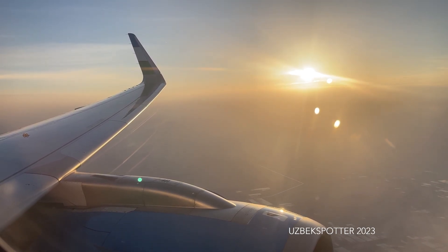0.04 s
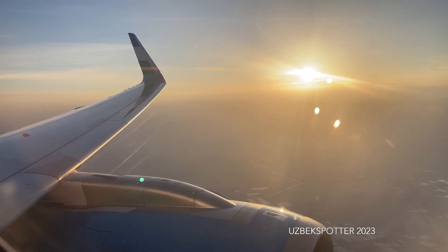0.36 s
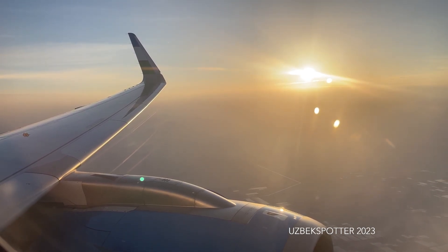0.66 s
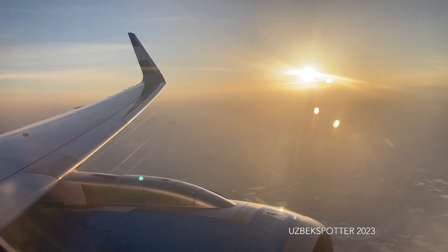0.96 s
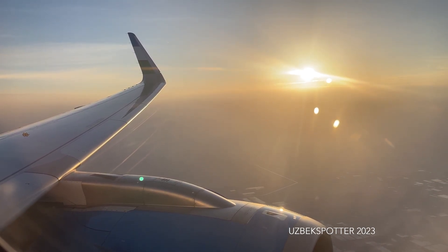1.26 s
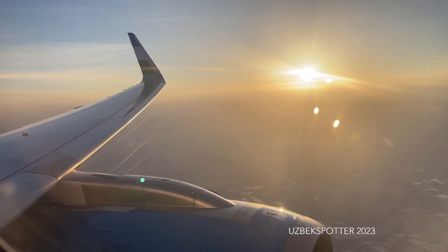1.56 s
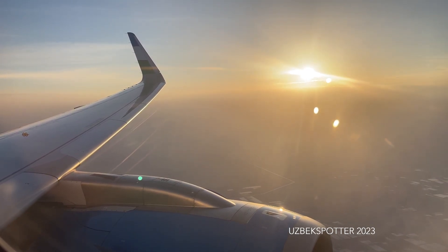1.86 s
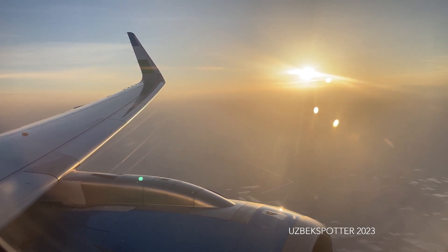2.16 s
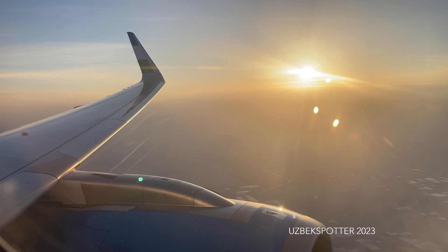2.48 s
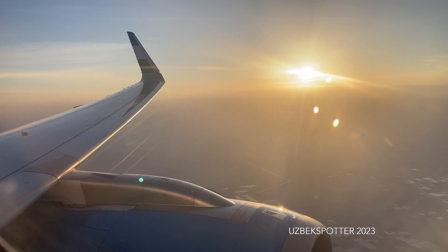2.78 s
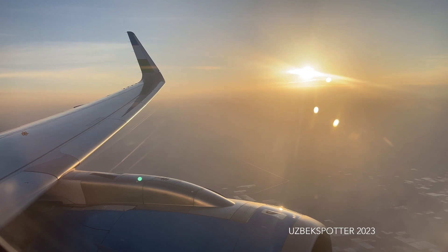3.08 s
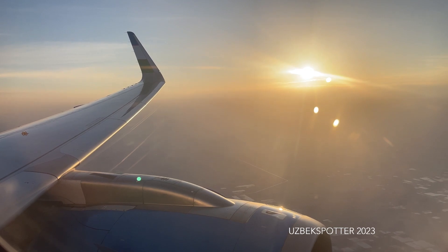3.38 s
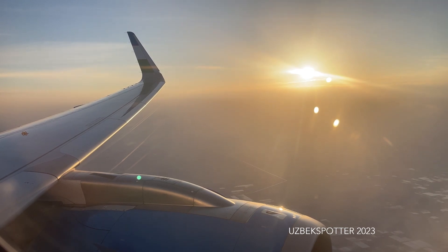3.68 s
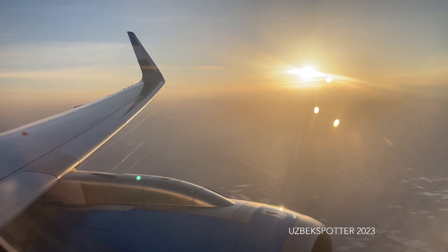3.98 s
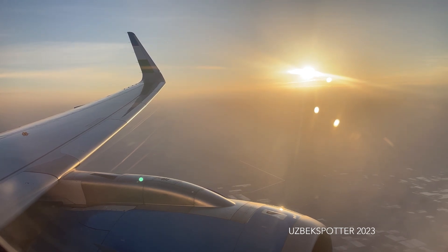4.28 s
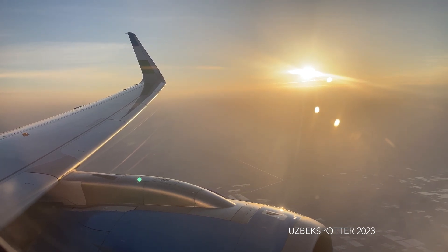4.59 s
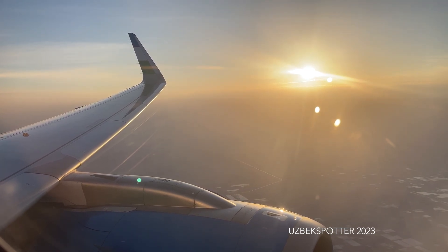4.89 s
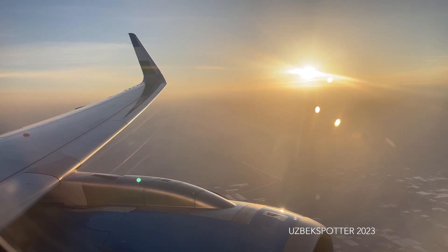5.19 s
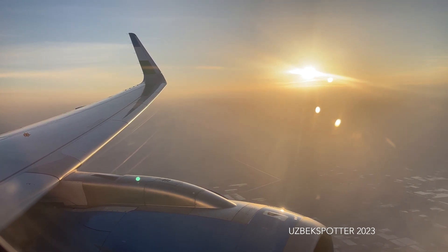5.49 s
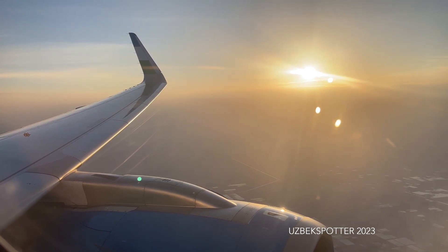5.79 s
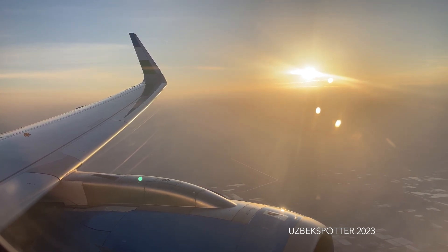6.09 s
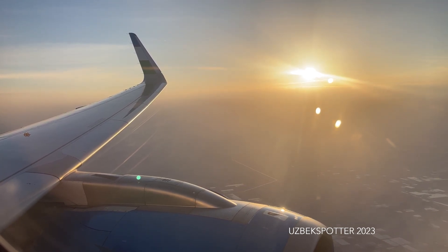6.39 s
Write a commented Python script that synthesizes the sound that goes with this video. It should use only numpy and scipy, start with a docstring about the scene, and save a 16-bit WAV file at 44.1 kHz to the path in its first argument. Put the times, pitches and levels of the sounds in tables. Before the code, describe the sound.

A steady, deep rumble of jet engines and rushing air fills an airliner cabin, heard from a window seat. A thin, high turbine whine holds to the right, and an air vent whistles faintly. Close to the microphone, plastic trim gives a soft knock early on, cloth rustles briefly midway, and another knock and a few small ticks come near the end.

```python
"""A steady, deep rumble fills a window seat beside the engine of a jet in cruise.
Engines and airflow shake the fuselage, and the cabin's resonances colour the roar. Air rushes along
the skin, a thin turbine whine stands to the right, beating with the far engine's, and a vent whistles
breathily. Close by, cloth rustles faintly and plastic trim knocks and ticks a few times."""
import sys
import numpy as np
from scipy import signal
from scipy.fft import rfft, irfft
from scipy.io import wavfile
from scipy.ndimage import uniform_filter1d

SR = 44100
rng = np.random.default_rng(int(sys.argv[2]) if len(sys.argv) > 2 else 0)


def persist_wave(psi):
    """Save psi, clipped to +-1, as 16-bit WAV."""
    counts = np.round(np.clip(psi, -1, 1) * 32767).astype(np.int16)
    wavfile.write(sys.argv[1], SR, np.atleast_2d(counts).T)


N = 293265
TIME = np.arange(N) / SR
FREQS = np.maximum(np.fft.rfftfreq(N, 1 / SR), 1)
TONE_A_HZ, TONE_B_HZ = 3177.0, 3402.3  # the near turbine's two tones


def undb(db):
    """Decibels to gain."""
    return 10 ** (np.asarray(db) / 20)


def over_pitch(points):
    """A curve through (frequency_hz, value) points on a log-frequency axis."""
    hz, value = np.transpose(points)
    return np.interp(np.log(FREQS), np.log(hz), value)


def over_time(points):
    """An envelope of straight lines through (time_s, value) points."""
    return np.interp(TIME, *np.transpose(points))


def walk(rate_hz):
    """Smooth random drift: held steps, slewed twice, with a spread near 1."""
    hold = int(SR / rate_hz)
    steps = rng.standard_normal(N)[np.arange(N) // hold]
    return np.sqrt(2) * uniform_filter1d(uniform_filter1d(steps, hold), hold)


def swell(peak_s, length_s, rise_share=0.62):
    """A rounded rise and fall that peaks at 1 and stays above one half for length_s."""
    flank_s = length_s * np.where(TIME < peak_s, rise_share, 1 - rise_share)
    return 0.5 ** (((TIME - peak_s) / flank_s) ** 2)


def band(x, hz, width_hz):
    """One resonance applied twice for steep flanks, scaled to unit rms."""
    detuning = (FREQS / hz - hz / FREQS) * hz / width_hz
    ringing = irfft(rfft(x) / (1 + 1j * detuning) ** 2, N)
    return ringing / ringing.std()


def cabin_field(spectrum, left_lag_s=0.000892, in_step_below_hz=440):
    """Turbulent pressure of the given spectrum rings the cabin and reaches the seat in stereo."""
    # cabin and wall-panel resonances: centre_hz, width_hz, lift_db
    resonances = [(61.2, 11, 5), (85.8, 18.4, 6), (140.5, 34, 5.8), (174, 15, 2), (221, 20, 0.5),
                  (247.2, 28.5, 6), (422.6, 27.3, 6), (517, 62, 4), (754, 104, 3.5), (1213, 140, 3),
                  (1450, 220, 0.5), (2074, 470, 7.5), (4320, 140, 4), (4690, 130, 3.5), (6130, 800, 4.5),
                  (8980, 260, 3)]
    # long waves reach both sides alike, short ones are diffuse: frequency_hz, likeness (0-1)
    likeness = [(50, 1), (100, 0.99), (160, 0.89), (215, 0.8), (280, 0.67), (350, 0.79), (440, 0.96),
                (540, .2), (950, .55), (1300, 0.15), (2000, 0.3), (9000, 0)]
    # the window side, on the right, is louder: frequency_hz, left_minus_right_db
    balance = [(60, -2), (190, -3), (250, -3.5), (330, -1), (430, 0), (520, -3.5), (750, -6), (1200, -5),
               (1700, -3.5), (2200, -1.5), (3400, -2.5), (4500, -7), (6600, 0), (10000, 1)]
    gain = undb(over_pitch(spectrum)) * np.sqrt(SR / 2)
    for centre_hz, width_hz, lift_db in resonances:
        bell = 0.5 ** ((2 * (FREQS - centre_hz) / width_hz) ** 2)
        gain *= undb(lift_db * bell)
    right, diffuse = rfft(rng.standard_normal((2, N)))
    alike = over_pitch(likeness)
    # the shared part reaches the left late, but low waves fill the cabin in step
    lag_s = left_lag_s / (1 + (in_step_below_hz / FREQS) ** 4)
    delayed = right * np.exp(-2j * np.pi * FREQS * lag_s)
    left = alike * delayed + np.sqrt(1 - alike ** 2) * diffuse
    lean = undb(over_pitch(balance) / 2)
    return irfft(gain * np.array([left * lean, right / lean]), N)


def rumble(heave_db=0.7):
    """The engines' low roar comes through the wall, heaving very slightly."""
    # roar before the cabin colours it: frequency_hz, density_db (power per Hz)
    roar = [(20, -62), (28, -69.5), (42, -43.5), (60, -41), (115, -41.5), (200, -42.5), (300, -43),
            (400, -44.5), (435, -46), (465, -56.5), (600, -101.5), (800, -160)]
    return cabin_field(roar) * undb(heave_db * walk(3.5))


def airflow(swell_db=0.3, flutter_db=0.5, hiss_above_hz=4800):
    """Boundary-layer rush; passing eddies make it flutter, and its treble slowly rises and falls."""
    # air along the skin and from the vents, before the cabin: frequency_hz, density_db (power per Hz)
    air = [(30, -90.5), (450, -53), (640, -56.5), (950, -62), (1300, -70.5), (1700, -74.5), (2200, -84.2),
           (2700, -81.5), (3600, -87.5), (5200, -93), (7400, -95.5), (9700, -94.5), (10500, -101),
           (11400, -100), (11900, -111), (12500, -135)]
    # fader ride on the treble hiss: time_s, gain_db
    hiss_ride = [(0, 2), (.75, 0), (1.0, -0.7), (1.6, 0.5), (2.05, 1), (2.35, 3), (2.7, 0.5), (3.3, 1),
                 (3.5, -1.5), (3.85, 2), (4.3, 0.5), (4.55, 1.3), (4.95, -0.3), (5.35, 0.5), (5.9, -.5),
                 (6.2, 1.6)]
    rush = cabin_field(air)
    hiss = irfft(rfft(rush) / (1 + (hiss_above_hz / FREQS) ** 8), N)
    body = rush - hiss
    eddies = undb(swell_db * walk(1.5) + flutter_db * walk(6.7))
    return (body + hiss * undb(over_time(hiss_ride))) * eddies


def near_whine(wander_hz=0.59, scatter_db=-23, dip_db=-3):
    """Clean turbine tones ride one shaft speed; shifting reflections make each side shimmer."""
    # the two tones, their combination tones and overtones: multiple_of_a, multiple_of_b
    partials = [(1, 0), (0, 1), (2, -1), (-1, 2), (2, 0), (1, 1), (0, 2)]
    # each partial's level before shimmer and dip: left_db, right_db
    levels = [(-60.5, -45.5), (-68, -53.5), (-80.5, -80.5), (-77, -78.5), (-80.5, -75), (-71.5, -77),
              (-75.5, -69)]
    speed = 1 + wander_hz / TONE_A_HZ * walk(4.3)
    phase_per_hz = 2 * np.pi * np.cumsum(speed) / SR
    whine = np.zeros((2, N))
    for (of_a, of_b), sides_db in zip(partials, levels):
        tone = np.exp(1j * (of_a * TONE_A_HZ + of_b * TONE_B_HZ) * phase_per_hz)
        for side, level_db in enumerate(sides_db):
            shimmer = 1 + undb(scatter_db) * (walk(7) + 1j * walk(7.4))
            whine[side] += np.sqrt(2) * undb(level_db) * np.real(shimmer * tone)
    return whine * undb(dip_db * swell(peak_s=2.6, length_s=2.5))  # sinks once and recovers


def far_whine(offset_hz=3.0, wander_hz=0.39, level_db=-73):
    """The other engine's tone drifts on its own just above tone A, so the two beat slowly."""
    pitch_hz = TONE_A_HZ + offset_hz + wander_hz * walk(0.97)
    return np.sqrt(2) * undb(level_db) * np.sin(2 * np.pi * np.cumsum(pitch_hz) / SR)


def vent(lower_hz=4365, upper_hz=4670, width_hz=95, waver_db=2.3, upper_waver_db=3, upper_db=-6):
    """An air nozzle's breathy whistle swells and ebbs; a weaker one above it comes and goes."""
    # slow contour of the lower whistle: time_s, level_db
    contour = [(0, -64.5), (1.4, -62.5), (3.1, -63.8), (4.3, -67.5), (6.6, -66.5)]
    lower = band(rng.standard_normal((2, N)), lower_hz, width_hz) * undb(waver_db * walk(12))
    upper = band(rng.standard_normal((2, N)), upper_hz, width_hz) * undb(upper_waver_db * walk(6))
    contour_db = over_time(contour)
    return lower * undb(contour_db) + upper * undb(contour_db.mean() + upper_db)


def fibre_slips(stereo_spread=0.97, grain_samples=64, grit_db=1.2):
    """Fibres slip in a dense cloud of tiny noise grains of slightly uneven strength."""
    grains = rng.exponential(size=N // grain_samples + 1)
    strength = undb(grit_db * np.repeat(grains, grain_samples)[:N])
    return strength * (rng.standard_normal(N) + stereo_spread * rng.standard_normal((2, N)))


def rustles(width_share=0.8):
    """A sleeve now and then brushes past something, each stroke a broad band of slipping fibres; one short
    burst gives the knock at 5.43 s its bright contact."""
    # brushes of cloth, plus the bright contact of the knock at 5.43 s (last but two), before the roll-off: #
    # peak_s, level_db, length_s, centre_hz
    brushes = [(0.668, -52, .024, 7600), (1.91, -52, 0.011, 9400), (3.008, -47, 0.024, 8700),
               (3.04, -44, 0.04, 10800), (3.027, -47.5, .075, 5100), (3.043, -42, 0.058, 2300),
               (3.12, -54.5, .13, 6200), (3.278, -53, 0.0091, 8000), (3.991, -46.5, 0.016, 8200),
               (4.008, -55, .028, 7200), (5.438, -55, .018, 9400), (6.256, -49, .016, 8100),
               (6.414, -49, .019, 7800)]
    # soft cloth gives little top end: frequency_hz, gain_db
    roll_off = [(9200, 0), (11500, -5), (13500, -18)]
    fibres = fibre_slips()
    cloth = np.zeros((2, N))
    for peak_s, level_db, length_s, centre_hz in brushes:
        stroke = band(fibres, centre_hz, width_share * centre_hz)
        cloth += undb(level_db) * stroke * swell(peak_s, length_s, rise_share=0.37)
    return irfft(rfft(cloth) * undb(over_pitch(roll_off)), N)


def plastic_taps(hits, width_hz, decay_s, stereo_spread=0.5):
    """Plastic gives a short crack that dies in a broad resonance."""
    crack = rng.standard_normal(N) + stereo_spread * rng.standard_normal((2, N))
    taps = np.zeros((2, N))
    for start_s, level_db, ring_hz in hits:
        envelope = (TIME >= start_s) * np.exp(-np.abs(TIME - start_s) / decay_s)
        taps += undb(level_db) * band(crack, ring_hz, width_hz) * envelope
    return taps


def trim():
    """The plastic trim ticks brightly and takes a few duller, longer knocks."""
    # ticks of the trim: start_s, level_db, ring_hz
    ticks = [(3.026, -46, 12800), (6.152, -46, 10500), (6.160, -43, 11000), (6.545, -39, 7800)]
    # soft knocks against it: start_s, level_db, ring_hz
    knocks = [(0.662, -40, 1900), (5.432, -34.5, 1700), (6.546, -44, 2000)]
    bright = plastic_taps(ticks, width_hz=7900, decay_s=0.0039)
    dull = plastic_taps(knocks, width_hz=1000, decay_s=0.019)
    return bright + dull


def scene():
    """The bed of engines and air, with small, close sounds on top."""
    return rumble() + airflow() + near_whine() + far_whine() + vent() + rustles() + trim()


def record(dry, twist_band_hz=(8950, 11700), cutoff_hz=15600):
    """A phone feeds both sides nearly the same high treble, turned in phase, and cuts the top."""
    # bleed from right to left, rising in the top octave: frequency_hz, likeness (0-1)
    bleed = [(7500, 0.01), (9000, .65), (10200, 0.96)]
    # the microphone loses the highest treble: frequency_hz, gain_db
    mic_response = [(12000, -0.5), (12900, -19.5), (15500, -20)]
    left, right = rfft(dry * signal.windows.tukey(N, 0.001))
    alike = over_pitch(bleed)
    twist = np.interp(FREQS, twist_band_hz, (0, 2 * np.pi))  # one full turn between the sides
    left = (np.sqrt(1 - alike ** 2) * left + alike * right) * np.exp(1j * twist)
    dulled = irfft(undb(over_pitch(mic_response)) * np.array([left, right]), N)
    lowpass = signal.ellip(10, 0.2, 70, cutoff_hz, fs=SR, output="sos")
    return signal.sosfilt(lowpass, dulled)


dry = scene()
out = record(dry)
persist_wave(out)
```